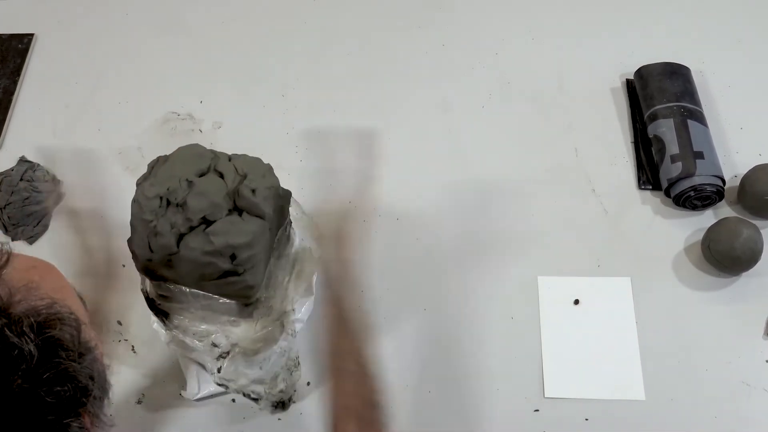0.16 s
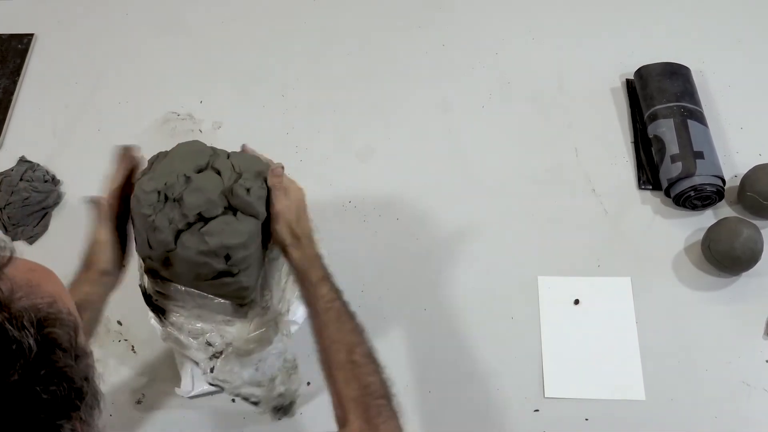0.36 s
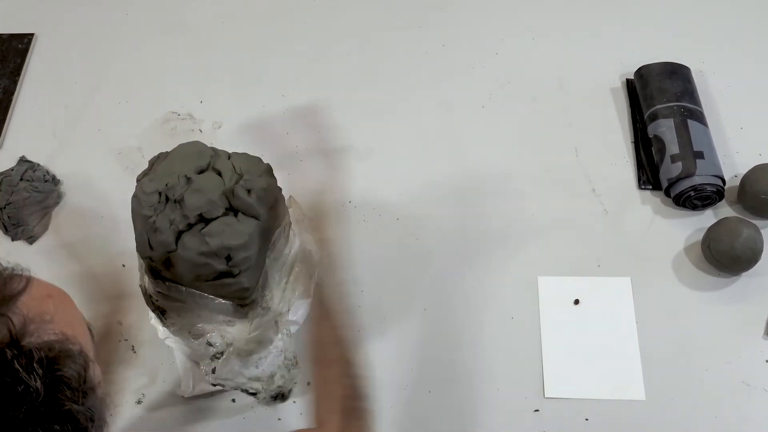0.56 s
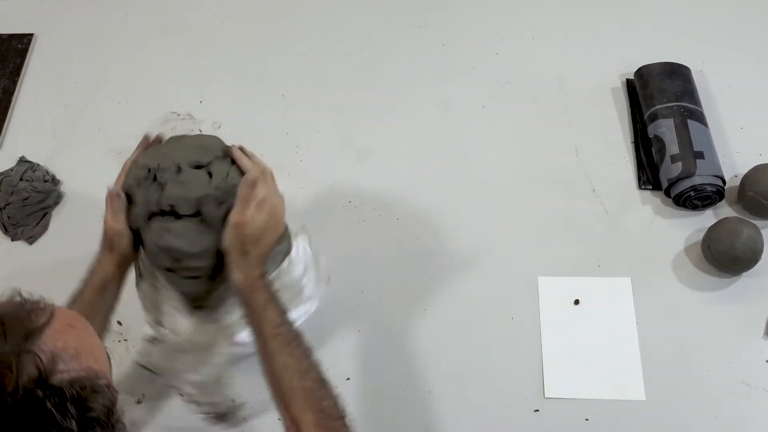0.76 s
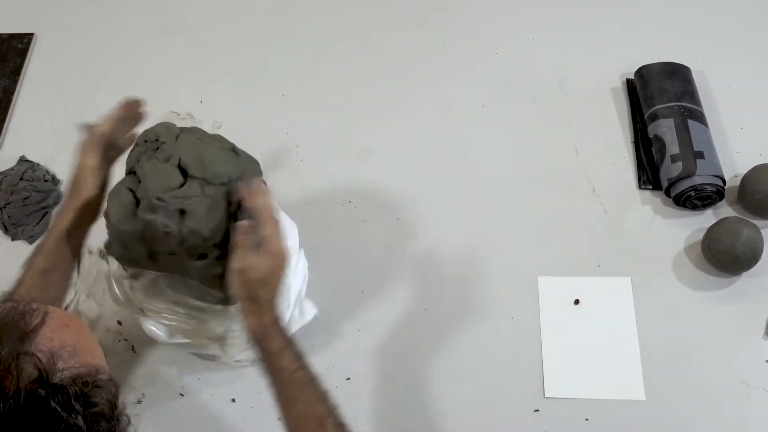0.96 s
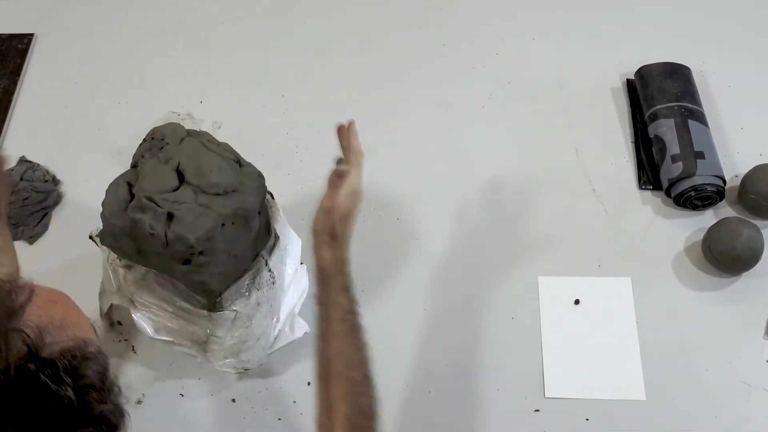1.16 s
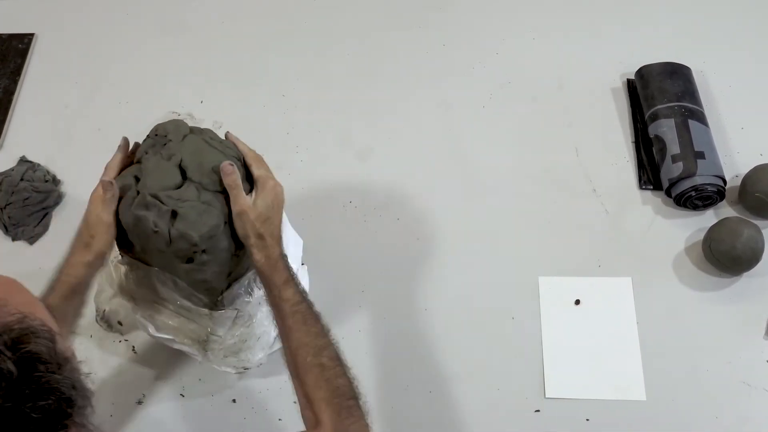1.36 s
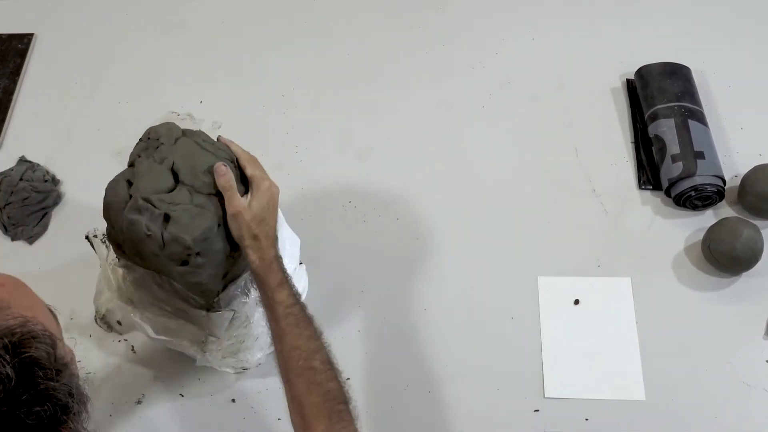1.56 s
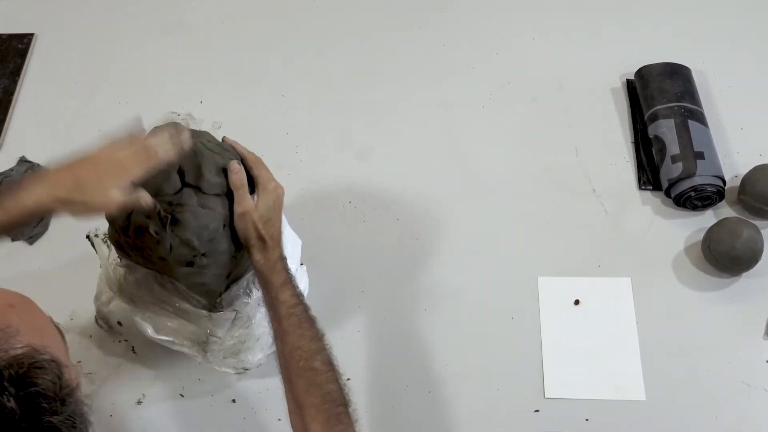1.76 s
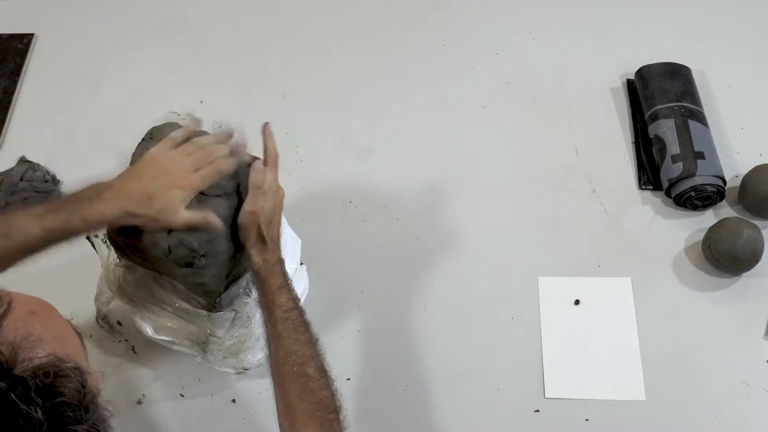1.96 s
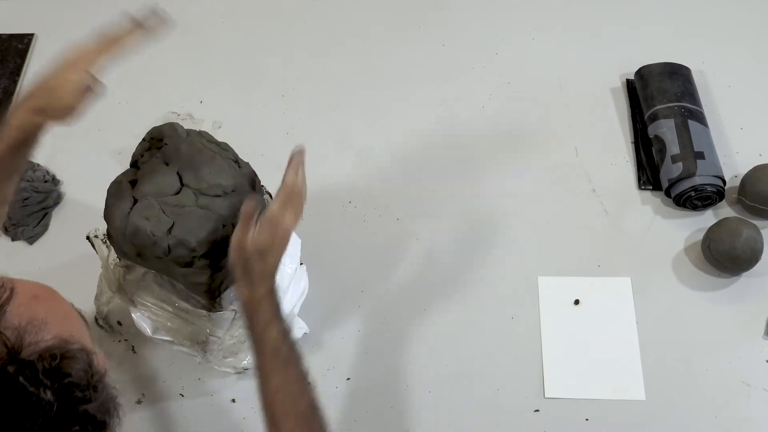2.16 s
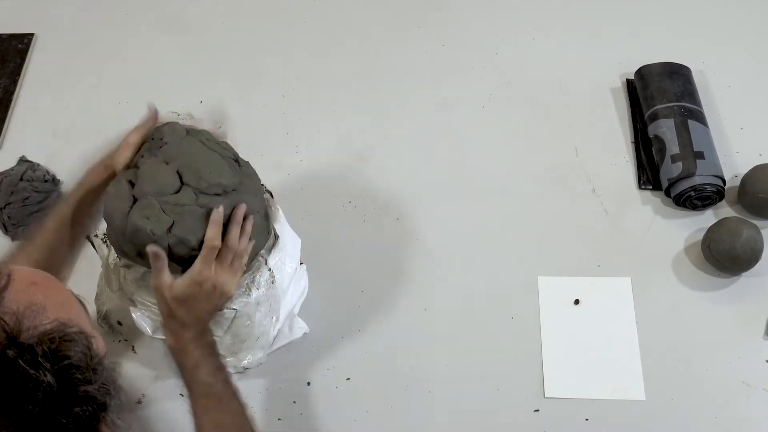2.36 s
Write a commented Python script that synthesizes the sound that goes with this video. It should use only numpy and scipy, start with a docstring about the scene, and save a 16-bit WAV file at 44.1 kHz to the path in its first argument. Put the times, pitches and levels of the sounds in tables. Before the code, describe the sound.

Five wet, smacking hand slaps on a clay block, with dull table thuds and ringing room echo

```python
"""Bare hands slap a lump of wet clay into a block on a table, in a hard, echoing room.
Over quiet room air an earlier slap's echo dies away as filtered noise; then come five slaps, the first three
of contacts some ms apart, each a wet crack of noise and a pop of trapped air as a short decaying sine.
The lump thuds in dull noise and the table rings low; between slaps the plastic sheet slides in soft hiss.
At the end the sheet slides once more and two ticks of narrow noise snap; decaying noise makes the echo."""
import sys
import numpy as np
from scipy import signal
from scipy.fft import rfft, irfft
from scipy.io import wavfile

SR = 44100
rng = np.random.default_rng(int(sys.argv[2]) if len(sys.argv) > 2 else 0)


def to_wav(s):
    """Save 16-bit WAV."""
    ch = np.atleast_2d(s).T  # columns
    pcm = np.round(np.clip(ch, -1, 1) * 32767)  # PCM
    wavfile.write(sys.argv[1], SR, pcm.astype(np.int16))


N = 110250  # samples: 2.5 s

# background air of the room: (frequency [Hz], level [dB])
AIR_COLOUR = [(25, 7), (60, 11.5), (130, -8.5), (300, -7.5), (800, -6.5), (2000, -22), (4000, -19),
              (8000, -33), (16000, -29.5)]
AIR_DB = -41.5
# echo of an earlier slap, already dying away: (frequency [Hz], level [dB])
LINGER_COLOUR = [(100, -11.5), (500, -4), (900, 1), (1400, -3), (2200, 0), (2900, -11.5), (3800, -6.5),
                 (4700, -16), (5800, -10.5), (9000, -24), (12000, -24)]
LINGER_DB, LINGER_T60_S = -34, 0.93
LINGER_TREBLE_HZ, LINGER_TREBLE_T60_S = 4500, 0.3
# wall echoes: (frequency [Hz], echo energy against the direct sound [dB], t60 [s], build-up [s])
ROOM_BANDS = [(60, 0.5, 1.7, 0.018), (149, 4, 0.75, 0.012), (300, 5, 0.73, 0.01), (550, 0.5, 0.98, 0.0085),
              (1000, -2, 1.32, 0.0027), (2100, -1, 1.075, 0.0014), (3800, 2.5, 0.79, 0.001),
              (5930, -7.5, 0.63, .002), (9000, -10, 0.51, 0.0017), (15000, -5, 0.32, .002)]
FIRST_ECHO_S = 0.0079  # gap before the walls answer
NEAR_DB, NEAR_FADE_S = -14.5, 0.012  # scatter from the table top and arms
WALL_S, WALL_DB, WALL_EDGE_HZ = 0.0098, -17, 3500  # one clear, dulled reflection off the nearest wall
# low ring of the table under each blow: (frequency [Hz], level [dB], t60 [s])
TABLE_RING = [(27, -3, 0.71), (45, -6.5, 1), (79.6, -5.5, 0.27), (99, 1, 0.48), (129.2, 3, 0.25)]
# the plastic sheet slides on the table: (time [s], length [s], level before colouring [dB])
SHEET_SLIDES = [(0.66, 0.5, -45), (1.053, 0.24, -61), (2.41, 0.13, -49)]
# colour of the sliding hiss: (frequency [Hz], level [dB])
SLIDE_COLOUR = [(200, 8), (1000, 3), (2200, 16.5), (2900, 1.5), (3800, 9), (4700, -4), (5700, 3),
                (9500, -11.5), (12500, -8.5), (16000, -16)]
# ticks of the plastic sheet and sticky clay:
# (time [s], level before filtering [dB], centre [Hz], half width [octaves], room send [dB])
SHEET_TICKS = [(2.4140, -26.5, 7700, .9, -1), (2.4251, -15, 2920, 0.51, 4.5)]
TICK_FADE_S = 0.00084
# dull blows of the lump on the table: (time [s], level before filtering [dB], treble edge [Hz],
# attack [s], fade [s], room send [dB], table ring [dB])
LUMP_THUDS = [(0.245, -16.5, 900, 0.0036, 0.032, -6, -36), (0.299, -17, 1000, 0.0025, 0.025, 0, -31),
              (0.45, -40, 300, 0.0034, .015, -8, -62), (.642, -31.5, 500, 0.0049, 0.051, -1.5, -41),
              (0.7, -20, 1700, 0.0018, 0.014, -4, -56), (1.279, -25, 300, 0.0047, 0.032, -5, -42.5),
              (1.728, -31, 550, 0.0048, 0.017, 4, -40.5), (1.7921, -21.5, 1430, 0.00088, 0.015, -1.5, -54),
              (1.88, -26.5, 1300, 0.00089, 0.017, 0.5, -74), (2.029, -27, 600, 0.0044, 0.026, 5.5, -43),
              (2.099, -15, 810, 0.0057, 0.023, -1, -52), (2.182, -22, 1310, 0.0014, 0.015, -5, -66)]
# body of the lump and table: (frequency [Hz], level [dB])
BODY_COLOUR = [(25, -9.5), (45, -3.5), (65, -0.5), (125, 10.5), (165, 4), (220, 14), (340, 7.5),
               (450, 12.5), (900, 15), (2000, 4), (6000, -4.5)]
# hand contacts, levels before filtering: (time [s], palm hollow [Hz], palm level [dB],
# finger pocket [Hz], pocket level [dB], pocket swell [s], wet crack level [dB], crack top edge [Hz],
# squirt over the crack [dB], pops to room [dB], crack to room [dB])
HAND_SLAPS = [(0.239, 730, -24, 2100, -45, 0.0007, -3.5, 13200, -6, 5.5, -3),
              (0.2424, 477, -7, 1610, 2.5, 0.00025, -3, 9000, 4, 1.5, -0.5),
              (0.635, 935, -2, 1992, -1.5, 0.00074, -3, 13200, -14, -4, 3.5),
              (0.6408, 650, -4.5, 2196, -4, 0.00082, -2.5, 14100, -27, -2, -21),
              (1.2688, 800, -31.5, 1760, -27, 0.00022, -17, 14000, -9, -4, -13),
              (1.2716, 934, -11.5, 1923, -6, 0.00049, -17, 11340, -5, -4.5, -1),
              (1.2898, 587, -18, 2100, -24.5, 0.0002, -14.5, 16000, 0.5, 2.5, -0.5),
              (1.7163, 595, -18.5, 2100, -22.5, 0.00028, -11, 13000, -4.5, 7.5, -1.5),
              (2.0196, 548, -2.5, 1780, -3, 0.00011, -2, 13700, -8, 1, 0)]
# colour given to the crack, direct and in the echo: (frequency [Hz], level [dB])
CRACK_COLOUR = [(100, -8.5), (400, -7.5), (1500, -2.5), (2350, 6.5), (2900, -4.5), (3850, 1), (4600, -12),
                (5700, -0.5), (6500, -8.5), (7300, -3), (8600, -11), (12500, -10.5), (16000, -14.5)]
PALM_SWELL_S, CRACK_FADE_S = 0.00061, 0.0016
ROOM_POP_SHARE = 0.82  # the echo of the pops is fed by slightly shorter, broader pops
SQUIRT_HZ, SQUIRT_WIDTH_HZ = 6100, 1800  # whistle of air squeezed out through the wet film
OVERLOAD, TOP_HZ = 0.9, 16200  # ceiling of the rounded peaks [full scale]; top edge of the sound


def undb(db):
    """Turn dB into an amplitude factor."""
    return 10 ** (np.asarray(db) / 20)


def on_log(hz, points_hz, values):
    """Join points by straight lines on a log-frequency axis."""
    return np.interp(np.log(np.maximum(hz, 1)), np.log(points_hz), values)


def colour(x, points):
    """Causal (minimum-phase) filter through (Hz, dB) points."""
    size = 2 * N
    hz, db = np.array(points).T
    gain = undb(on_log(np.arange(N + 1) * SR / size, hz, db))
    cepstrum = irfft(np.log(gain))
    # folding the cepstrum forward in time keeps the filter from sounding early
    cepstrum[1:N] *= 2
    cepstrum[N + 1:] = 0
    return irfft(rfft(x, size) * np.exp(rfft(cepstrum)))[:N]


def band(x, hz, kind, order=2):
    """Butterworth filter."""
    edges = np.clip(hz, 1, SR / 2 - 1)
    return signal.sosfilt(signal.butter(order, edges, kind, fs=SR, output="sos"), x)


def since(start):
    """Seconds since start, zero before."""
    return np.maximum(np.arange(N) / SR - start, 0)


def click(start):
    """A single sharp impulse."""
    return 1.0 * (np.arange(N) == int(start * SR))


def burst(start, fade_s):
    """Noise that starts at once and dies away."""
    t = since(start)
    return (t > 0) * np.exp(-t / fade_s) * rng.standard_normal(N)


def pop(start, hz, swell_s):
    """A pocket of air that rings for a few cycles."""
    t = since(start)
    swell = t / swell_s * np.exp(1 - t / swell_s)
    return swell * np.sin(2 * np.pi * hz * t)


def background():
    """Quiet room air and the last of an earlier slap's echo, its treble fading first."""
    air = colour(rng.standard_normal(N), AIR_COLOUR)
    # a level falls 60 dB in log(1000) fade times
    lows = band(burst(0, LINGER_T60_S / np.log(1000)), LINGER_TREBLE_HZ, "low")
    treble = band(burst(0, LINGER_TREBLE_T60_S / np.log(1000)), LINGER_TREBLE_HZ, "high")
    linger = colour(lows + treble, LINGER_COLOUR)
    return undb(AIR_DB) * air + undb(LINGER_DB) * linger


def room(x):
    """Close scatter, then dense wall echoes: the lows build slowly, the treble dies first."""
    hz, db, t60, build = np.array(ROOM_BANDS).T
    freqs = np.arange(N // 2 + 1) * SR / N
    t = since(FIRST_ECHO_S)
    noise = rfft(rng.standard_normal(N))
    response = np.zeros(N)
    for k in range(len(hz)):
        share = on_log(freqs, hz, np.arange(len(hz)) == k)  # crossfades into the next bands
        envelope = (1 - np.exp(-t / build[k])) * np.exp(-np.log(1000) * t / t60[k])
        envelope /= np.sqrt(np.sum(envelope ** 2))
        response += undb(db[k]) * irfft(noise * share, N) * envelope
    response += undb(WALL_DB) * band(click(WALL_S), WALL_EDGE_HZ, "low")
    near = burst(0.001, NEAR_FADE_S)
    response += undb(NEAR_DB) * near / np.sqrt(np.sum(near ** 2))
    return signal.fftconvolve(x, response)[:N]


def table():
    """Each thud sets off the table top's low modes, which ring as decaying sines."""
    t = since(0)
    ring = np.zeros(N)
    for hz, db, t60 in TABLE_RING:
        ring += undb(db) * np.exp(-np.log(1000) * t / t60) * np.sin(2 * np.pi * hz * t)
    blows = sum(undb(ring_db) * click(start) for start, *_, ring_db in LUMP_THUDS)
    return signal.fftconvolve(blows, ring)[:N]


def slides():
    """Smooth hiss of the plastic sheet dragged over the table, swelling and sinking with each slide."""
    swell = np.zeros(N)
    for start, length, db in SHEET_SLIDES:
        swell += undb(db) * np.sin(np.pi * np.minimum(since(start) / length, 1))
    return colour(rng.standard_normal(N) * swell, SLIDE_COLOUR)


def ticks():
    """Small snaps as the hand lets go: short banded noise; returns the direct sound and the room feed."""
    out = np.zeros((2, N))
    for start, db, hz, width, send_db in SHEET_TICKS:
        edges = hz * 2 ** (width * np.array([-1, 1]))
        snap = undb(db) * band(burst(start, TICK_FADE_S), edges, "band", order=3)
        out += [snap, undb(send_db) * snap]
    return out


def thuds():
    """The soft lump takes the blow and rocks on the table; returns the direct sound and the room feed."""
    out = np.zeros((2, N))
    for start, db, edge_hz, attack_s, fade_s, send_db, _ in LUMP_THUDS:
        softened = burst(start, fade_s) * (1 - np.exp(-since(start) / attack_s))
        blow = undb(db) * band(softened, edge_hz, "low")
        out += [blow, undb(send_db) * blow]
    return [colour(path, BODY_COLOUR) for path in out]


def slaps():
    """Air pops under palm and fingers while wet skin cracks; returns the direct sound and the room feed."""
    pops, cracks = np.zeros((2, N)), np.zeros((2, N))
    squirt_edges = SQUIRT_HZ + SQUIRT_WIDTH_HZ * np.array([-0.5, 0.5])
    for (start, palm_hz, palm_db, pocket_hz, pocket_db, pocket_s,
         crack_db, edge_hz, squirt_db, pop_room_db, crack_room_db) in HAND_SLAPS:
        palm = palm_hz, palm_db, PALM_SWELL_S, -1
        pocket = pocket_hz, pocket_db, pocket_s, 1
        for hz, db, swell_s, sign in (palm, pocket):
            pops[0] += sign * undb(db) * pop(start, hz, swell_s)
            room_pop = pop(start, hz, ROOM_POP_SHARE * swell_s) / np.sqrt(ROOM_POP_SHARE)
            pops[1] += sign * undb(db + pop_room_db) * room_pop
        # the echo of the crack is fed by one even click, scaled by the room send
        even_click = np.sqrt(CRACK_FADE_S * SR / 2) * click(start)
        paths = np.array([burst(start, CRACK_FADE_S), undb(crack_room_db) * even_click])
        squirt = band(paths, squirt_edges, "band", order=1)
        cracks += undb(crack_db) * band(paths + undb(squirt_db) * squirt, edge_hz, "low")
    return [band(p, 290, "high", order=1) + colour(c, CRACK_COLOUR) for p, c in zip(pops, cracks)]


def scene():
    """Slaps, thuds and ticks with their echo, over the table's ring, the sliding sheet and the room air."""
    slap, slap_feed = slaps()
    thud, thud_feed = thuds()
    tick, tick_feed = ticks()
    echo = room(slap_feed + thud_feed + tick_feed)
    mix = background() + echo + table() + slides() + tick + thud + slap
    return mix[None]  # one channel


def record(dry):
    """The microphone rounds the loudest peaks; the top is cut."""
    rounded = dry / (1 + (dry / OVERLOAD) ** 4) ** 0.25
    return signal.sosfilt(signal.ellip(8, 0.2, 80, TOP_HZ, fs=SR, output="sos"), rounded)


dry = scene()
out = record(dry)
to_wav(out)
```